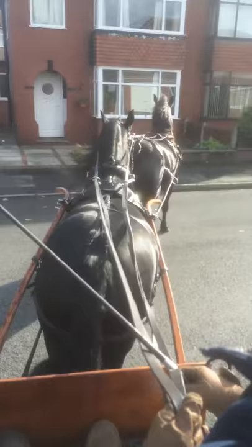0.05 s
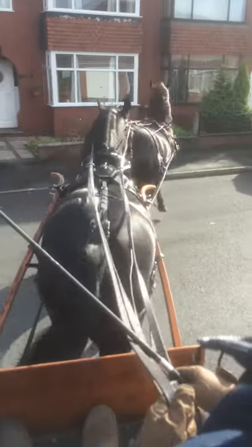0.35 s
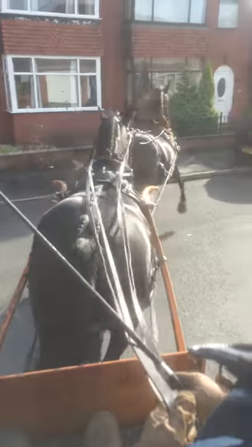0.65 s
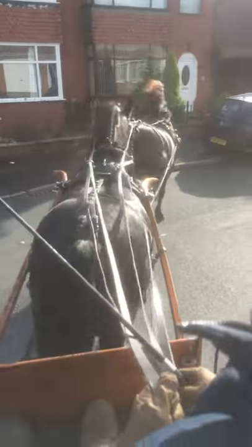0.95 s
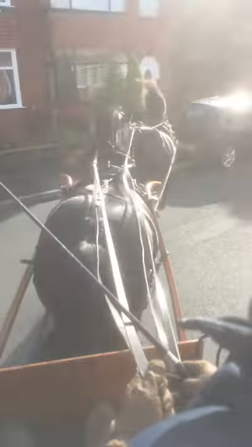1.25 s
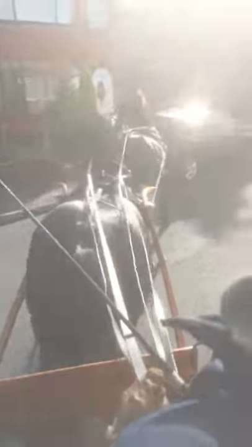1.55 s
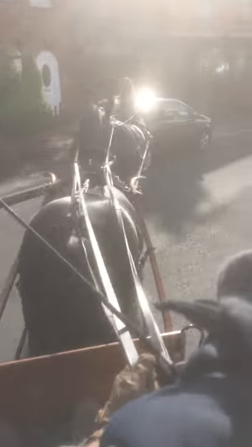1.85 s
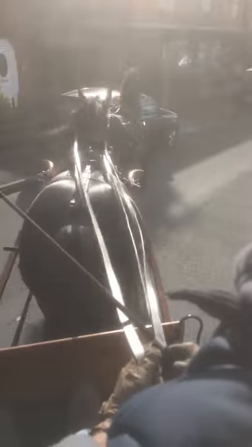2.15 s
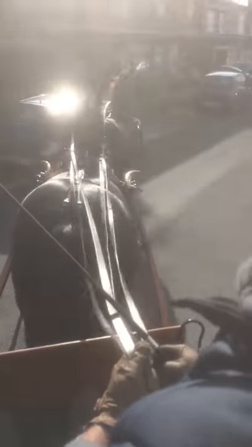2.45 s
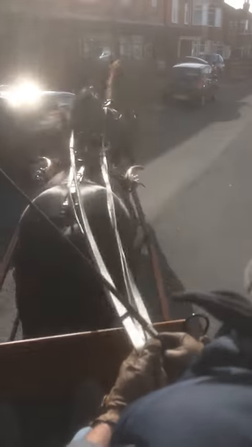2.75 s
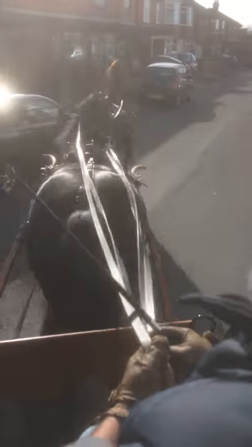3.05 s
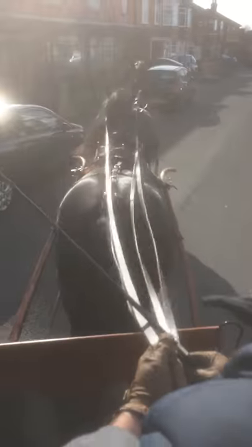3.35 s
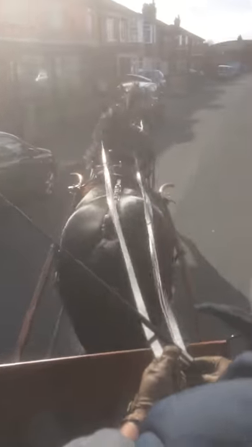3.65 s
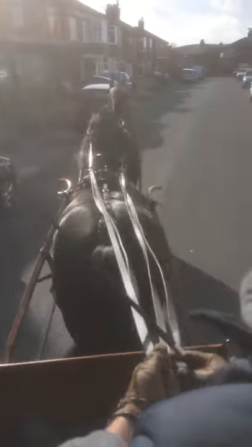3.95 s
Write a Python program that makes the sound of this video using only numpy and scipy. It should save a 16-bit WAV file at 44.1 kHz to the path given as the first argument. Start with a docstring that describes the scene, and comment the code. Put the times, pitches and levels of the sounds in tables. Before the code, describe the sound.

Two shod horses trot along a street as wind buffets the microphone and wheels rumble.

```python
"""Clip-clop: two shod horses trot down an asphalt street, heard from the cart they pull.
Each hoof lands in two or three quick contacts, each a hollow knock, a hard clack and a click of iron.
The shoes scuff over grit, harness metal jingles, and the brick houses throw these sounds back.
Gusts of wind buffet the microphone, and the cart's wheels rumble underneath."""
import sys
import numpy as np
from scipy import signal
from scipy.fft import rfft, irfft
from scipy.io import wavfile
from scipy.ndimage import uniform_filter1d

SR = 44100
rng = np.random.default_rng(int(sys.argv[2]) if len(sys.argv) > 2 else 0)


def store_pcm(level_fs):
    """Save levels as 16-bit WAV."""
    pcm = np.round(np.clip(level_fs, -1, 1) * 32767).astype(np.int16)
    wavfile.write(sys.argv[1], SR, np.atleast_2d(pcm).T)


N = 176400  # 4 seconds

# Each touch of a hoof on the road: start_s, pitch_hz, decay_s, knock_db, clack_db, iron_db
HOOF_CONTACTS = [(0.1425, 980, 0.0039, -28.5, -25.5, -59), (0.1508, 779, 0.0096, -23.5, -23, -35),
                 (0.1615, 776, 0.0046, -20, -19.5, -29), (0.3288, 1130, 0.00058, -18.5, -66, -39),
                 (0.341, 875, 0.0087, -19, -27.5, -35.5), (.441, 765, 0.0023, -17.5, -29, -39),
                 (.448, 965, 0.0034, -19.5, -30, -34), (0.5556, 1260, 0.0018, -34, -27, -42),
                 (.5672, 706, 0.0013, -13.5, -24.5, -38.5), (0.7472, 930, 0.00081, -12.5, -35, -35),
                 (.893, 920, 0.0021, -16.5, -30, -36), (0.9142, 1040, 0.0016, -15.5, -15.5, -58),
                 (0.924, 780, 0.0044, -21, -21, -21.5), (1.2143, 890, 0.0017, -27, -31, -37.5),
                 (1.226, 816, 0.0014, -10.5, -52, -30), (1.2891, 770, 0.0049, -24, -24, -56),
                 (1.323, 848, 0.0038, -23.5, -19.5, -34.5), (1.369, 960, 0.0033, -21.5, -33, -52),
                 (1.6798, 1015, 0.0018, -13.5, -21.5, -40), (1.6885, 750, 0.003, -19.5, -21.5, -37),
                 (1.6926, 853, 0.0052, -20, -17, -28.5), (1.781, 832, 0.0031, -20.5, -29.5, -41),
                 (1.8102, 925, 0.0014, -24.5, -43, -44.5), (2.054, 1010, 0.0011, -22, -29, -36.5),
                 (2.0748, 1070, 0.0013, -22.5, -25, -45), (2.137, 1090, 0.0017, -24, -34, -42),
                 (2.1491, 880, 0.003, -29.5, -26, -31), (2.2537, 1230, 0.0035, -45, -37, -39),
                 (2.266, 1050, 0.0026, -27, -28, -43.5), (2.279, 870, 0.0026, -27, -40, -45),
                 (2.4222, 1040, 0.0057, -16, -15, -51), (2.432, 801, 0.0066, -20.5, -17.5, -31.5),
                 (2.4526, 834, 0.0035, -28, -27.5, -39), (2.6105, 980, 0.0062, -31.5, -40, -34.5),
                 (2.717, 935, 0.0043, -16.5, -29.5, -34.5), (2.7412, 770, 0.0034, -23, -34.5, -42),
                 (2.7814, 837, 0.01, -36, -23, -60), (2.7921, 842, 0.011, -36, -28.5, -36),
                 (2.821, 790, 0.02, -36.5, -28.5, -44), (3.0384, 1130, 0.0017, -20, -32.5, -29),
                 (3.0474, 770, 0.001, -14.5, -21, -29.5), (3.1584, 706, 0.0053, -36, -33, -46),
                 (3.1674, 910, 0.0017, -14.5, -14.5, -49), (3.171, 793, 0.0071, -23, -19, -26.5),
                 (3.2036, 980, 0.0015, -19, -31, -38), (3.467, 1220, 0.0019, -33, -39.5, -32.5),
                 (3.52, 700, 0.0045, -25.5, -36, -51), (3.527, 795, 0.0084, -22.5, -33, -36.5),
                 (3.57, 1000, 0.0027, -25.5, -44, -63), (3.5844, 828, 0.013, -26, -26, -56),
                 (3.883, 910, 0.0041, -33, -39.5, -30), (3.8942, 880, 0.0032, -23.5, -27.5, -30),
                 (3.9064, 800, 0.0047, -25, -39, -46), (3.93, 1057, 0.0064, -32.5, -38, -45)]
# Tone of the clack on asphalt: frequency_hz, gain_db
CLACK_TONE = [(200, -40), (500, -11), (1300, -1.5), (1900, -5.5), (2400, -3.5), (3200, -7), (4200, -7),
              (5500, -13), (9000, -37.5), (16000, -28)]
# Tone of the iron shoe's click: frequency_hz, gain_db
CLICK_TONE = [(2500, -16.5), (5200, 3.5), (7400, 2.5), (8400, -2.5), (10000, -3.5), (12500, -13.5),
              (16000, -14)]
# Tone of a hard-struck shoe's bright ring: frequency_hz, gain_db
SHOE_RING_TONE = [(6500, 4), (8300, 12.5), (11000, 2), (16000, -34)]
# Shoes dragging after they land: start_s, level_db
SHOE_DRAGS = [(0.179, -34.5), (0.761, -38), (1.335, -31.5), (2.08, -33), (2.623, -41.5), (2.805, -40.5),
              (3.528, -44), (3.925, -29)]
# Tone of grit under a sliding shoe: frequency_hz, gain_db
SCUFF_TONE = [(400, 6), (1000, 5), (2200, -1), (7500, -6.5), (15000, -40)]
# Jolts that shake the harness: start_s, level_db
HARNESS_JOLTS = [(.834, -38), (1.037, -58), (1.117, -44), (1.655, -39), (1.9367, -32), (2.013, -46),
                 (2.524, -39), (2.579, -35), (2.6229, -28.5), (2.9157, -33), (2.944, -34.5), (3.398, -33),
                 (3.6185, -35), (3.72, -34.5), (3.789, -34), (3.806, -36.5), (3.94, -30.5)]
# Strength of the loose chain's tinkling: time_s, level_db
CHAIN_LEVEL = [(0, -45), (.6, -45), (1.4, -54), (2.7, -45), (4, -46)]
# Notes a buckle rings with, and their time to fade by 60 dB: pitch_hz, fade_s
BUCKLE_NOTES = [(7700, .07), (11900, .11), (12700, .09), (13600, .07), (14600, .05)]
# Tone of metal hitting metal: frequency_hz, gain_db
CLINK_TONE = [(3500, -22), (6000, 2), (7500, -1), (10000, -2.5), (13000, -3.5), (15500, -19.5)]
# Time the street's echo takes to fade by 60 dB: frequency_hz, fade_s
ECHO_FADE = [(200, .3), (900, 0.34), (3000, 0.42), (8000, 0.44), (15000, 0.38)]
# Tone of the echo: frequency_hz, gain_db
ECHO_TONE = [(300, -6.5), (900, 3), (4000, -2), (8000, -0.5), (14000, -9)]
# Strength of the wind on the microphone: time_s, level_db
GUST_LEVEL = [(0, -26), (0.063, -25.5), (.09, -45.5), (.16, -37), (0.199, -30), (.25, -29.5), (.45, -30.5),
              (0.501, -22), (.6, -41.5), (.68, -40), (0.742, -27), (.82, -47), (.87, -30), (1, -27.5),
              (1.2, -30.5), (1.42, -36.5), (1.48, -45), (1.75, -41), (1.93, -43), (2.1, -31.5),
              (2.25, -44.5), (2.55, -34), (3, -42), (3.229, -36), (3.32, -54.5), (3.428, -43.5),
              (3.498, -23.5), (3.6, -28.5), (3.69, -34.5), (3.77, -21), (3.902, -33.5), (4, -21.5)]
# Tone of the wind's deep rumble: frequency_hz, gain_db
WIND_TONE = [(20, -39), (40, -5), (70, 5.5), (115, -1), (200, -9), (600, -67)]
# Tone of the swirling air: frequency_hz, gain_db
SWIRL_TONE = [(80, -12), (190, 1), (280, -2), (480, -6), (700, -17.5), (1200, -24.5), (10000, -107)]
# Small swirls slapping the microphone: time_s, level_db
WIND_SLAPS = [(0.2, -18.5), (0.334, -20), (0.373, -19.5), (0.483, -26), (0.508, -14.5), (0.544, -21),
              (0.568, -23), (0.736, -12), (1.006, -28), (1.181, -17), (1.228, -20), (1.276, -26),
              (3.507, -21.5), (3.638, -19.5), (3.704, -23.5), (3.758, -21.5), (3.779, -18.5),
              (3.813, -23.5)]
# Tone of one slap: frequency_hz, gain_db
SLAP_TONE = [(60, -3), (420, 6.5), (600, 0), (900, -18), (2000, -33.5), (12000, -118)]
# Large swirls thudding on the microphone: time_s, pitch_hz, peak_db
WIND_THUDS = [(0.049, 99, -26.5), (.198, 139, -18), (0.314, 83, -21), (0.49, 97, -19), (.878, 120, -11),
              (.984, 144, -13.5), (1.077, 119, -12.5), (1.105, 96, -16.5), (1.271, 98, -12),
              (2.087, 102, -17.5), (2.136, 109, -13), (2.396, 97, -16.5), (2.53, 129, -19),
              (3.507, 111, -9.5), (3.777, 162, -9), (3.814, 114, -13), (3.862, 92, -14.5),
              (3.948, 101, -15.5)]
# Tone of the wheels on the street: frequency_hz, gain_db
WHEEL_TONE = [(20, -15), (50, 18), (160, -8.5), (500, -13), (880, -2), (1400, -13.5), (3000, -18),
              (7000, -24), (15000, -37)]
# Strength of the wheel noise: time_s, level_db
WHEEL_LEVEL = [(0, 3.5), (.55, 4), (0.709, -2), (0.841, 3.5), (1.15, -4.5), (1.55, 1), (3.5, 5),
               (3.8, -0.5)]


def hooves():
    """Each contact rings the hollow hoof, cracks on the asphalt and clicks the iron shoe."""
    out, t = np.zeros(N), np.arange(-.01, .1, 1 / SR)
    after = np.maximum(t, 0)  # time since the hoof touched down
    sag, sag_s = .14, .001  # the pitch starts 14% high and settles as weight comes on
    rise = 1 - np.exp(-after / .00036)
    for start_s, pitch_hz, decay_s, knock_db, clack_db, iron_db in HOOF_CONTACTS:
        clop_hz = 1820 * (1 + .085 * rng.standard_normal())  # the hoof's higher note, driven by the clack
        cycles = pitch_hz * (after + sag * sag_s * (1 - np.exp(-after / sag_s)))
        knock = amp(5.5 + knock_db) * np.sin(2 * np.pi * cycles) * np.exp(-after / decay_s)
        clop = amp(4.5 + clack_db) * np.sin(2 * np.pi * clop_hz * after) * np.exp(-after / .0019)
        clack = amp(17.5 + clack_db) * crack(t, CLACK_TONE, decay_s=.0009)
        click = amp(20.5 + iron_db) * crack(t, CLICK_TONE, decay_s=.0006)
        ring_db = 5 + 2 * min(iron_db + 18, 0)  # only the hardest strikes ring clearly
        ring = amp(ring_db) * crack(t, SHOE_RING_TONE, decay_s=.0006)
        add(out, start_s + t[0], clack + click + ring - (knock + clop) * rise)
    return out


def crack(t, tone, decay_s):
    """A shoe snaps against the road at t = 0 amid crushed grit; the total energy is 1."""
    snap_noise, grit_noise, clump_noise = rng.standard_normal((3, len(t)))
    after = np.maximum(t, 0)
    rise_s, grit_rise_s, grit_decay_s = .00036, .0018, .007
    clumps = unit_level(abs(uniform_filter1d(clump_noise, size=50)))
    crunch = amp(-11) * grit_noise * clumps * np.exp(np.minimum(t / grit_rise_s, -t / grit_decay_s))
    snap = snap_noise * np.exp(-after / decay_s) * (1 - np.exp(-after / rise_s))
    sound = apply_tone(2 * snap + crunch, tone)
    return sound / np.linalg.norm(sound)


def scuffs():
    """After each contact the shoe slides a little; now and then it drags on in a longer scrape."""
    out, t = np.zeros(N), np.arange(SR // 7) / SR
    slide_decay_s, drag_peak_s = .022, .02
    for start_s, _, _, _, clack_db, _ in HOOF_CONTACTS:
        add(out, start_s, amp(-27.5 + .25 * clack_db) * grit(t) * np.exp(-t / slide_decay_s))
    for start_s, level_db in SHOE_DRAGS:
        add(out, start_s, amp(level_db) * grit(t) * t / drag_peak_s * np.exp(1 - t / drag_peak_s))
    return apply_tone(out, SCUFF_TONE)


def grit(t):
    """Single grains crackle in clumps as a shoe crushes them."""
    grains = rng.standard_normal(len(t)) * (rng.random(len(t)) < .025)
    clumps = abs(uniform_filter1d(rng.standard_normal(len(t)), size=120))
    return unit_level(grains) * unit_level(clumps)


def harness():
    """Buckles clink and ring briefly at each jolt; chain links tinkle faintly in between."""
    clinks, rings, t = np.zeros(N), np.zeros(N), np.arange(SR // 10) / SR
    pitch_hz, fade_s = np.transpose(BUCKLE_NOTES)[:, :, None]
    tinkle_count, rattle_s, clink_decay_s = 90, .012, .002
    tinkles = [(start_s, level_at(CHAIN_LEVEL, start_s) + 4.5 * rng.standard_normal())
               for start_s in rng.random(size=tinkle_count) * N / SR]
    for start_s, level_db in HARNESS_JOLTS + tinkles:
        for lateness in np.append(0, rng.random(size=3)):  # four quick hits, the later ones softer
            hit_s = start_s + rattle_s * lateness
            gain = amp(level_db - 1) * np.exp(-2 * lateness)
            detuned_hz = pitch_hz * (1 + .022 * rng.standard_normal(pitch_hz.shape))
            notes = amp(-60 * t / fade_s) * np.sin(2 * np.pi * detuned_hz * t)
            add(clinks, hit_s, gain * rng.standard_normal(len(t)) * np.exp(-t / clink_decay_s))
            add(rings, hit_s, gain * (rng.standard_normal(len(notes)) @ notes))
    return apply_tone(clinks, CLINK_TONE) + amp(-16.5) * rings


def street_echo(sound):
    """Scattered echoes swell when the house fronts answer, and change as the cart moves."""
    out, t = np.zeros(N), np.arange(SR * 2 // 3) / SR
    echoes_per_s, house_delay_s, house_spread_s = 1300, .0608, .006
    house_swell = 1 + np.exp(-((t - house_delay_s) / house_spread_s) ** 2)
    for phase in np.linspace(0, np.pi, 3, endpoint=False):  # three echo patterns blend in and out
        echoes = rng.standard_normal(len(t)) * (rng.random(len(t)) < echoes_per_s / SR) * (t > .003)
        hz, delay_s, spectrum = signal.stft(echoes * house_swell, SR, nperseg=256)
        fade = amp(-60 * delay_s / value_at_hz(ECHO_FADE, hz)[:, None])
        tail = signal.istft(spectrum * fade, SR, nperseg=256)[1]
        blend = np.cos(np.pi * np.arange(N) / SR / 2 + phase) * np.sqrt(2 / 3)
        out += signal.fftconvolve(sound * blend, tail / np.linalg.norm(tail))[:N]
    return amp(-8.5) * apply_tone(out, ECHO_TONE)


def wind():
    """Air rumbles on the microphone with each gust; strong gusts add lumpy swirls."""
    gust_db = level_at(GUST_LEVEL, np.arange(N) / SR)
    rumble = noise(WIND_TONE)
    rumble /= np.sqrt(uniform_filter1d(rumble ** 2, size=6000) + .017)  # even out chance swells
    swirl_db = -29.5 + 1.395 * (gust_db + 20.5) + 6 * drift(rate_hz=24.4)
    return amp(2.5 + gust_db) * rumble + amp(swirl_db) * noise(SWIRL_TONE)


def buffets():
    """Single swirls of air hit the microphone: small ones slap, large ones thud with a brief suction."""
    out, t = np.zeros(N), np.arange(-.04, .06, 1 / SR)
    slap_width_s, thud_width_cycles = .0042, .85
    for time_s, level_db in WIND_SLAPS:
        puff = rng.standard_normal(len(t)) * np.exp(-(t / slap_width_s) ** 2)
        slap = apply_tone(puff, SLAP_TONE)
        slap *= np.sqrt(slap_width_s * SR) / np.linalg.norm(slap)
        add(out, time_s + t[0], amp(level_db) * slap)
    for time_s, pitch_hz, peak_db in WIND_THUDS:
        swell = np.exp(-(pitch_hz * t / thud_width_cycles) ** 2)
        add(out, time_s + t[0], -amp(peak_db) * np.cos(2 * np.pi * pitch_hz * t) * swell)
    return out


def cart():
    """The wheels roll with a hiss that ebbs and returns, and rumble in uneven bumps."""
    roll = amp(-47 + level_at(WHEEL_LEVEL, np.arange(N) / SR)) * noise(WHEEL_TONE)
    rumble = signal.sosfiltfilt(signal.butter(2, 200, fs=SR, output="sos"), roll)  # below 200 Hz
    hiss = roll - rumble
    return hiss + rumble * amp(3 * drift(rate_hz=12))


def amp(db):
    """Turn decibels into a number to multiply a sound by."""
    return 10 ** (np.asarray(db) / 20)


def unit_level(sound):
    """Scale a sound so that its average power is 1."""
    return sound / np.sqrt(np.mean(sound ** 2) + 1e-20)


def level_at(table, time_s):
    """Look up a level between the times in a table."""
    return np.interp(time_s, *np.transpose(table))


def value_at_hz(table, hz):
    """Look up a value between the frequencies in a table."""
    table_hz, values = np.transpose(table)
    return np.interp(np.log(hz + 1), np.log(table_hz + 1), values)


def add(mix, start_s, sound):
    """Mix a sound in at its start time."""
    part = mix[max(round(start_s * SR), 0):][:len(sound)]
    part += sound[:len(part)]


def apply_tone(sound, tone, size=4096):
    """Filter a sound with a tone table, so that nothing is heard before the sound starts."""
    log_gain = np.log(amp(value_at_hz(tone, abs(np.fft.fftfreq(size, 1 / SR)))))
    response = np.fft.ifft(np.exp(np.conj(signal.hilbert(log_gain)))).real
    return signal.fftconvolve(sound, response[:size // 2])[:len(sound)]


def noise(tone):
    """Steady noise with the given tone."""
    gain = amp(value_at_hz(tone, np.fft.rfftfreq(N, 1 / SR)))
    return unit_level(irfft(rfft(rng.standard_normal(N)) * gain, N))


def drift(rate_hz):
    """A random wander, mostly slower than rate_hz."""
    gain = np.exp(-(np.fft.rfftfreq(N, 1 / SR) / rate_hz) ** 2)
    return unit_level(irfft(rfft(rng.standard_normal(N)) * gain, N))


def scene():
    """Hooves and harness with their street echo, over wind and wheels, in one channel."""
    horses = hooves() + scuffs() + harness()
    return (horses + street_echo(horses) + wind() + buffets() + cart())[None]


def record(dry):
    """The microphone loses the very highest treble."""
    cutoff_hz = 15400
    low_pass = signal.firwin(255, cutoff_hz, window=("kaiser", 9), fs=SR)
    return signal.oaconvolve(dry, low_pass[None], "same")


dry = scene()
out = record(dry)
store_pcm(out)
```